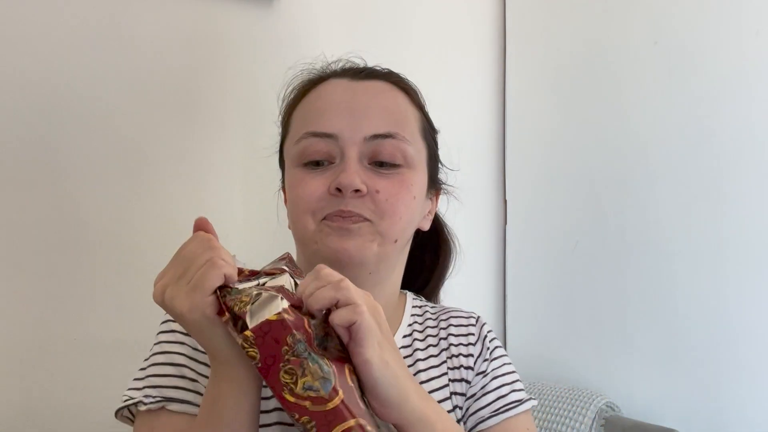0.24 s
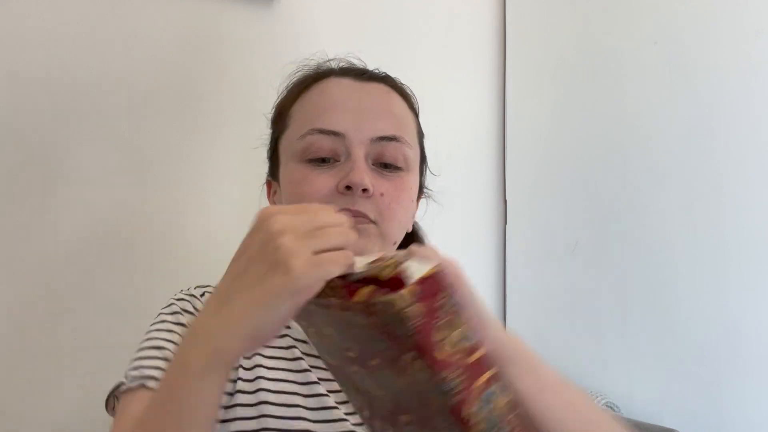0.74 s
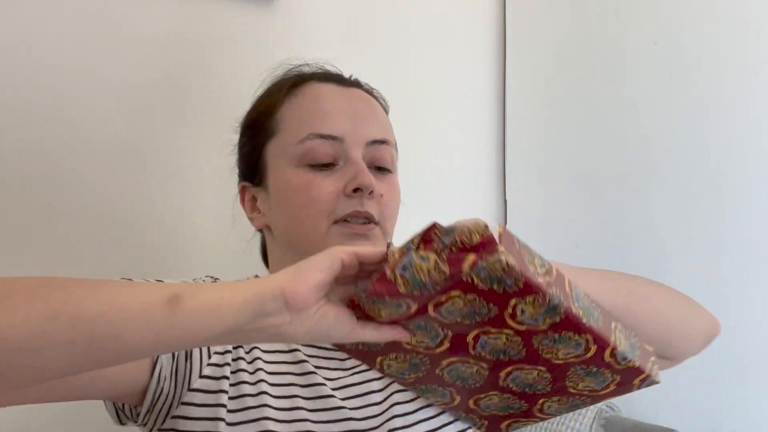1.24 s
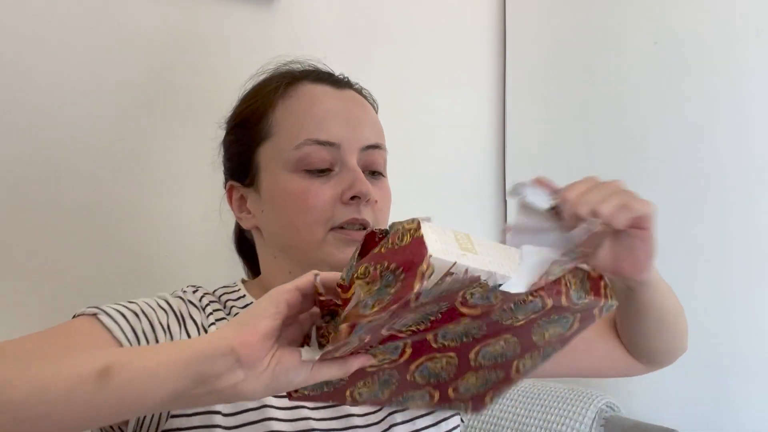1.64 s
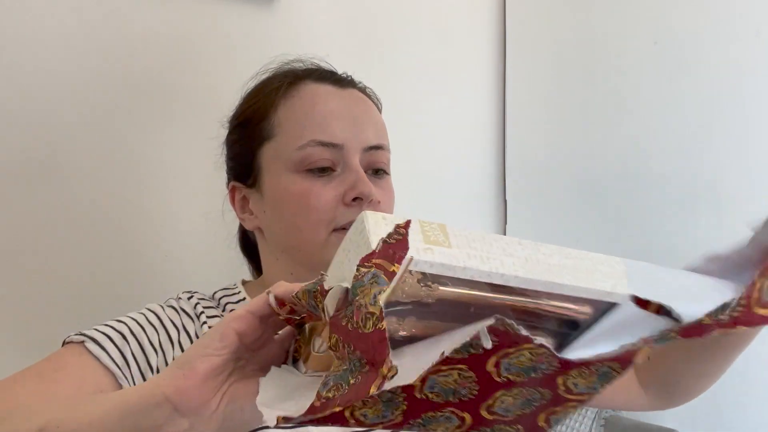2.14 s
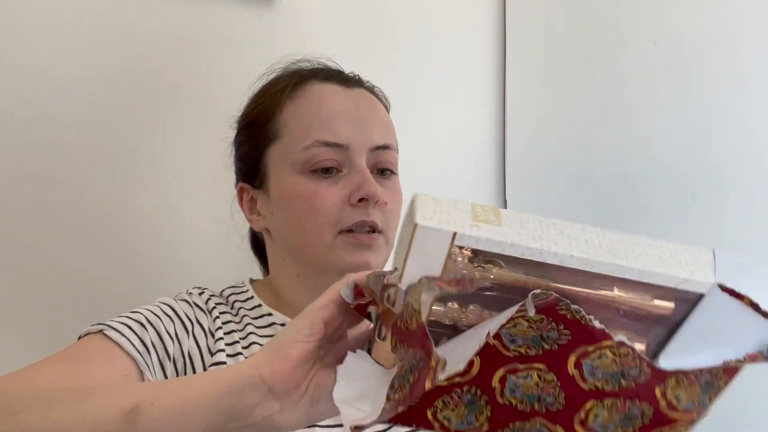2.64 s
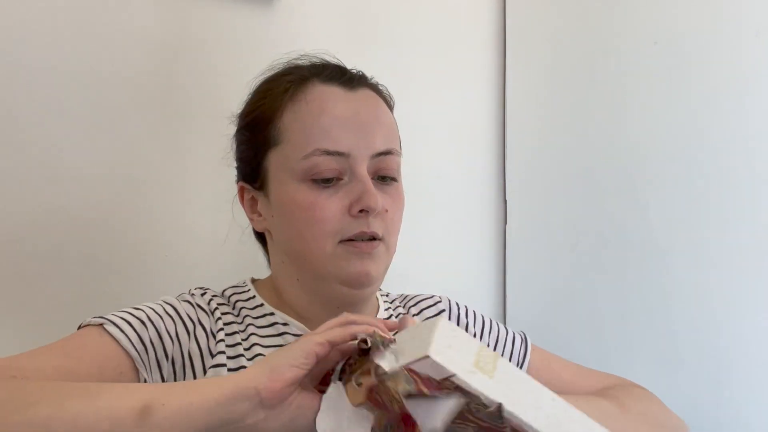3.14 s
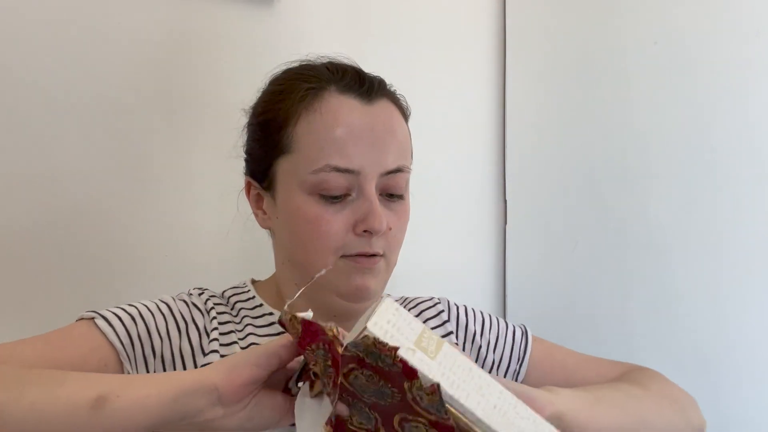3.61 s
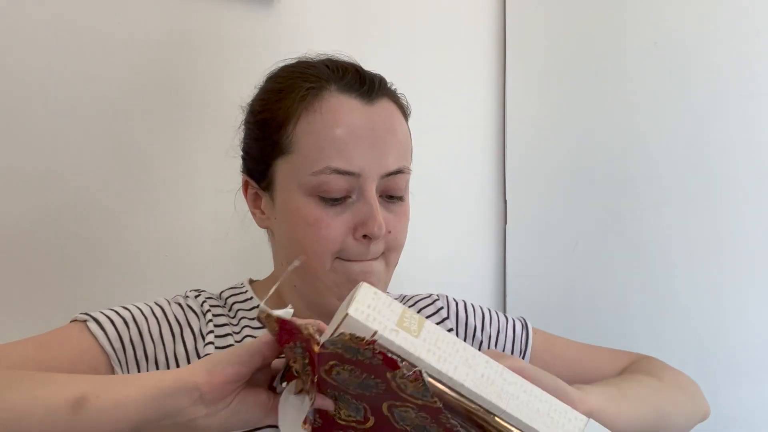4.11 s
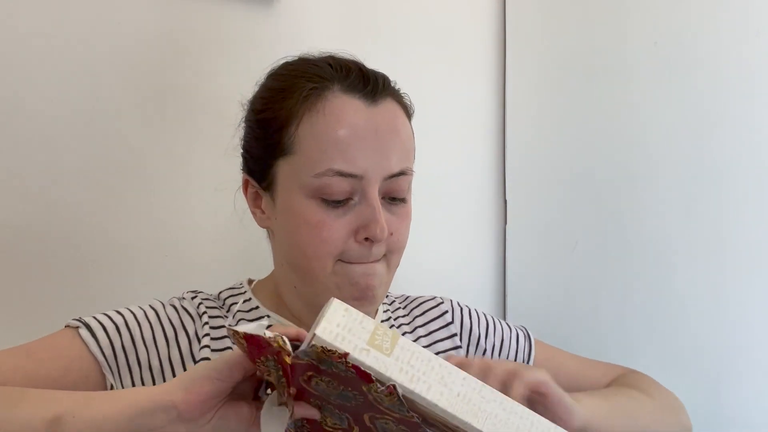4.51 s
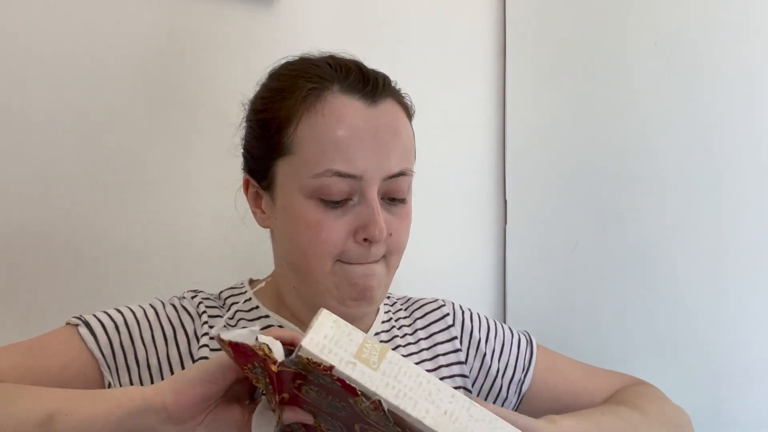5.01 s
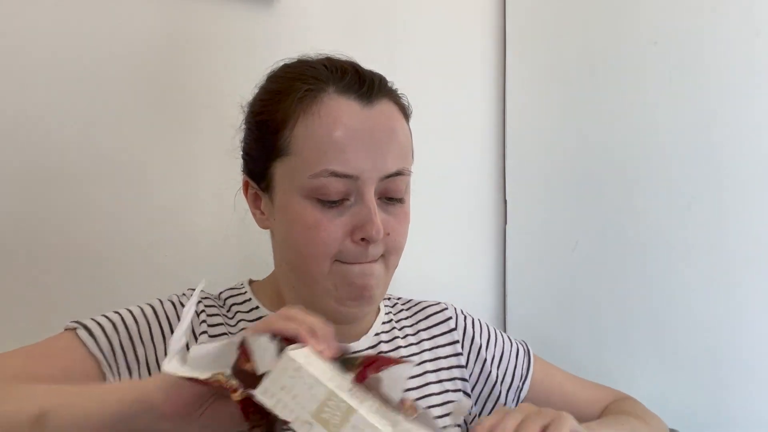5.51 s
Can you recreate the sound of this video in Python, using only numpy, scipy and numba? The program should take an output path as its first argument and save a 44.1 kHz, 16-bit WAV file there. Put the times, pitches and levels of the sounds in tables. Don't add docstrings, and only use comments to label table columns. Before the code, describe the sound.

A close stereo phone pickup in a small room with a short, slightly dull tail and a barely audible low hum. From 0 to 0.8 s, stiff glossy paper crinkles in dry, bright swarms of tiny snaps, with a hard crack near 0.33 s and soft finger knocks. It thins around 0.9-1.2 s. At 1.25 s comes the loudest moment: a ripping crack with a hollow low box knock, followed by taps and tearing until about 2 s, including a dull thump near 1.9 s. Crisp bright ticks snap at 2.13-2.16 s. From 2.2 to 2.9 s it is nearly quiet, with faint pats. Between 2.9 and 3.7 s, looser rustles, pops and boxy knocks return. A sharp hollow pop lands at 3.9 s. Sparse crinkles and light knocks follow, with a fuller crackle and knock at 4.97 s, soft rustling near 5.2-5.4 s, and small taps around 5.65 s.

```python
import sys
import numpy as np
from scipy import signal
from scipy.fft import rfft, irfft, next_fast_len
from scipy.io import wavfile
from scipy.ndimage import uniform_filter1d, minimum_filter1d, map_coordinates
from numba import njit

SR = 44100
rng = np.random.default_rng(int(sys.argv[2]) if len(sys.argv) > 2 else 0)


def field_ratio(decibels):
    return 10 ** (np.asarray(decibels, dtype=float) / 20)


def unload_wav(signal):
    wavfile.write(
        sys.argv[1],
        SR,
        np.round(np.clip(np.atleast_2d(signal).T, -1, 1) * 32767).astype(np.int16),
    )


N = 253731

# frequency in Hz, lag of the left port in turns, random spread by the walls in turns.
PORT_TURNS = [(104, 0, 0.017), (314, 0.11, 0.2), (1190, 0.059, 0.26), (3050, 0.19, 0.25),
              (4700, 0.46, 0.32), (7050, 0.69, 0.22), (10350, 1.08, 0.016), (10880, 1.1, 0.12),
              (10920, 1.19, 0.079), (13730, 1.38, 0.028), (16400, 1.44, 0.066)]


def along(table, hz, column=1):
    rows = np.transpose(table)
    return np.interp(np.log(np.maximum(hz, 1)), np.log(rows[0]), rows[column])


def hum():
    # time in seconds, level in dB.
    hum_levels = [(0.0, -58.5), (0.32, -71.5), (0.67, -63), (0.83, -72), (1.02, -70), (1.34, -60),
                  (1.63, -74), (1.89, -72), (2.91, -69), (3.14, -74.5), (4.02, -68.5), (4.31, -84),
                  (4.56, -76), (4.72, -72.5), (5.75, -76)]
    t, db = np.transpose(hum_levels)
    mains_band = signal.butter(2, [43, 60], "band", fs=SR, output="sos")
    drone = signal.sosfilt(mains_band, rng.standard_normal(N))
    return drone / drone.std() * field_ratio(np.interp(np.arange(N) / SR, t, db) + 11.5)


def room(x):
    t60_s, tail_db = 0.17, -6.5
    # frequency in Hz, left minus right in dB.
    port_balance = [(60, -1), (150, 3.5), (380, -2.5), (1300, -3), (2400, 1.5), (4400, -2), (9000, -1.5),
                    (15000, 0.5)]
    size = next_fast_len(N + SR)
    hz = np.arange(size // 2 + 1) * SR / size
    t = np.arange(SR // 2) / SR
    fade = field_ratio(-60 * t / t60_s) * np.clip(t / 0.0015, 0, 1)
    tails = rng.standard_normal((2, len(t))) * fade / np.sqrt(np.sum(fade ** 2))
    both, apart = rfft(tails, size)
    walls = both + apart * np.array([[1], [-1]]) * hz / (hz + 250)
    path = 1 + field_ratio(tail_db) * walls / (1 + hz / 5000)
    balance = field_ratio(along(port_balance, hz) * np.array([[.5], [-.5]]))
    return irfft(rfft(x, size) * path * balance, size)[:, :N]


def box(x):
    # mode frequency in Hz, width in Hz, level in dB.
    box_modes = [(126, 31, -12.5), (405, 21.7, 7.5), (508, 117, -6.5), (1030, 290, -5.5), (1560, 40, -51)]
    out = x
    for hz, width, db in box_modes:
        out = out + field_ratio(db) * signal.lfilter(*signal.iirpeak(hz, hz / width, SR), x)
    return out


@njit
def ring_loop(start, hz, t60, size, turn, left, swell):
    out = np.zeros((2, N))
    for k in range(len(start)):
        r = np.exp(-np.log(1000) / (t60[k] * SR))
        p = r * np.exp(2j * np.pi * hz[k] / SR)
        z = size[k] * np.sqrt(2 * (1 - r * r)) * np.exp(2j * np.pi * turn[k])
        gap, close = 1., np.exp(-hz[k] / (swell * SR))
        for i in range(start[k], min(N, start[k] + int(t60[k] * SR * 2 / 3) + 2)):
            gap *= close
            out[0, i] += (1 - gap) * (z * left[k]).imag
            out[1, i] += (1 - gap) * z.imag
            z *= p
    return out


def rings(s, hz, t60, db, swell):
    chance = rng.standard_normal((len(s), 2))
    lag = along(PORT_TURNS, hz) + along(PORT_TURNS, hz, column=2) * chance[:, 0]
    left = np.exp(-2j * np.pi * lag)
    return ring_loop((s * SR).astype(np.int64), hz, t60, field_ratio(db), chance[:, 1], left, max(swell, .02))


def knocks(detune=0.626, late_cycles=1.134):
    # start in seconds, peak in dB, pitch in Hz, ring t60 in seconds.
    finger_knocks = [(4.322, -29.5, 432, 0.055), (.281, -29, 597, 0.04), (.334, -26.5, 492, 0.044),
                     (.48, -26.5, 497, 0.031), (.532, -29.5, 560, 0.026), (.622, -25, 245.5, 0.12),
                     (.799, -34, 284, 0.065), (.854, -31.5, 402, 0.029), (1.143, -39, 487, 0.13),
                     (1.26, -13, 194, 0.036), (1.357, -30, 428, 0.073), (1.53, -29, 560, 0.041),
                     (1.793, -25, 469, 0.14), (2.414, -25, 219.5, 0.11), (2.737, -26.5, 370, 0.051),
                     (2.812, -32.5, 417, 0.058), (3.046, -28, 570, 0.035), (3.078, -20.5, 510, 0.066),
                     (3.188, -28, 314, 0.062), (3.414, -28, 256, 0.03), (3.645, -25, 423, 0.063),
                     (3.84, -25.5, 438, 0.041), (4.05, -30.5, 569, 0.12), (4.299, -27.5, 412, 0.045),
                     (4.43, -39, 693, 0.059), (4.6, -34.5, 421, 0.095), (4.725, -29, 197, 0.13),
                     (4.852, -30, 456, 0.069), (4.964, -22, 531, 0.084), (5.234, -34, 533, 0.17)]
    # start in seconds, peak in dB, pitch in Hz.
    nail_taps = [(.154, -27, 980), (.908, -43, 704), (1.319, -18, 1690), (1.568, -17.5, 514),
                 (2.036, -23, 1204), (2.151, -35, 1080), (2.306, -39, 1200), (2.551, -42, 452),
                 (2.926, -35, 446), (3.253, -23.5, 1385), (3.346, -28.5, 1060), (3.534, -27.5, 1060),
                 (3.82, -36, 402), (3.898, -14.5, 1010), (4.586, -33.5, 730), (5.521, -38, 690),
                 (5.654, -25, 985)]
    # start in seconds, peak in dB, pitch in Hz.
    palm_thumps = [
        (1.93, -24.5, 130),
        (2.42, -41, 140),
        (2.742, -30.5, 150),
        (3.66, -26, 133),
        (4.315, -50, 159),
        (4.588, -28.5, 148),
        (5.66, -33, 129),
    ]
    tap_t60_s, thump_t60_s = 0.019, 0.16
    taps = np.insert(nail_taps, 3, tap_t60_s, axis=1)
    thumps = np.insert(palm_thumps, 3, thump_t60_s, axis=1)
    hits = np.vstack([finger_knocks, taps, thumps])
    s, db, hz, t60 = (np.repeat(c, 5) for c in hits.T)
    step = np.tile(np.arange(-2, 3), len(hits))
    ratio = 2 ** (step * detune * (0.561 + .5 * rng.random(len(s))))
    late = late_cycles * (2 - step) / 4 * np.clip(1 / (hz * ratio) - 1 / 900, 0, 1)
    start = s + 0.001496 + late
    level_db = db + 12.0 - 5 * abs(np.log2(ratio))
    return rings(start, hz * ratio, np.clip(t60, .006, .4) / ratio, level_db, 0.47)


def gestures(t, table, rise, sag, fade):
    s, hold, db, bright = (c[:, None] for c in np.transpose(table))
    late = t - s
    rising = rise * np.minimum(late, 0)
    sagging = sag * np.clip(late, 0, abs(hold))
    fading = fade * np.maximum(late - abs(hold), 0)
    power = field_ratio(2 * (db + rising - sagging - fading))
    return power.sum(axis=0), (power * bright).sum(axis=0)


def hands():
    # start in seconds, hold in seconds, crackle in dB, brightness in dB.
    sudden_tugs = [(0.0, 0.0063, -35, 3.5), (0.047, 0.042, -35.5, 5.5), (0.239, .08, -36.5, 2.5),
                   (0.324, 0.024, -44.5, 4), (0.475, 0.057, -39, 5.5), (0.578, 0.075, -40.5, -4.5),
                   (0.69, 0.032, -41, 2.5), (0.796, 0.052, -48.5, 0), (0.916, .02, -54, -4.5),
                   (1.041, 0.034, -48.5, -1), (1.142, 0.036, -42, -4.5), (1.262, 0.099, -23.5, 1.5),
                   (1.532, 0.036, -29.5, 3), (1.783, .03, -47, 1), (2.138, 0.028, -33, -0.5),
                   (2.28, 0.0077, -53.5, 5), (2.393, 0.019, -57.5, -2.5), (2.618, 0.065, -64.5, 3),
                   (2.925, 0.068, -45.5, 4), (3.006, 0.09, -40, 1), (3.093, 0.041, -42, 0.5),
                   (3.639, .05, -47, 0.5), (3.83, 0.016, -40.5, -0.5), (3.895, 0.019, -39.5, -5.5),
                   (4.482, 0.02, -57, -3), (4.595, 0.044, -54.5, -13), (4.972, 0.13, -35, -1),
                   (5.511, 0.022, -56.5, 4), (5.624, 0.043, -48.5, 0), (5.736, .03, -46.5, -5)]
    # start in seconds, hold in seconds, crackle in dB, brightness in dB.
    slow_slides = [(0.183, 0.026, -36.5, 1), (0.405, .03, -38, -2), (1.22, .02, -46, -12),
                   (1.43, 0.0081, -46.5, 9), (1.611, 0.034, -31.5, 3.5), (1.836, 0.11, -29.5, 5),
                   (1.92, 0.1, -31, -1), (2.768, .04, -59.5, 2), (2.832, 0.014, -52, 10.5),
                   (3.191, 0.075, -41, 0), (3.384, 0.043, -62, -14), (3.536, 0.028, -45.5, -0.5),
                   (3.719, 0.062, -43, -1), (4.023, 0.061, -45.5, -0.5), (4.27, 0.059, -52, 11),
                   (4.723, 0.032, -43, 6), (4.86, 0.045, -43.5, 5), (5.169, 0.24, -43.5, 2),
                   (5.347, 0.033, -40, 3.5), (5.565, 0.033, -54, 0)]
    # time in seconds, resting rustle in dB, contact of paper and box in dB, slack in dB.
    grip_points = [(0.0, -62, 5.5, 4), (.35, -48, -2, -13.5), (.7, -51.5, -0.5, 1), (1.0, -62.5, 0, -9.5),
                   (1.6, -53, -1.5, 2), (2.0, -69, -1, -4.5), (2.3, -64.5, -8, -3.5), (2.55, -74.5, 13, 7),
                   (2.85, -61, 2.5, 0), (3.2, -47, -3.5, -1), (3.65, -72, 4, -0.5), (4.1, -55, 2.5, -3),
                   (4.33, -56.5, 5, 1.5), (4.575, -83, 1, -12), (4.62, -71, 4.5, -2.5),
                   (5.0, -59, -5.5, -2), (5.4, -69, -3, 1), (5.75, -61, 2, -2.5)]
    boom_keep = 0.21
    dull_share = 0.33
    t = np.arange(0, N / SR, 1 / 500)
    at, rest_db, contact_db, slack_db = np.transpose(grip_points)
    tug_power, tug_bright = gestures(t, sudden_tugs, rise=557, sag=79.5, fade=205)
    slide_power, slide_bright = gestures(t, slow_slides, rise=150, sag=50.5, fade=189)
    power = tug_power + slide_power + field_ratio(2 * np.interp(t, at, rest_db))
    top = 10 * np.log10(power)
    bright = (tug_bright + slide_bright) / power
    middle = np.interp(t, at, slack_db) - dull_share * bright
    boom = np.interp(t, at, contact_db) - boom_keep * (top + 45)
    return t, top, middle, boom, bright


def walk(rate):
    k = int(SR / rate)
    return 1.32 * uniform_filter1d(np.repeat(rng.standard_normal(N // k + 1), k), k)[:N]


def folds(s, hz, per_s=10, per_octave=5.5):
    grid = rng.standard_normal((int(N / SR * 30) + 2, 60))
    place = [s * min(per_s, 30), np.log2(hz / 100) * min(per_octave, 7)]
    return 1.32 * map_coordinates(grid, place, order=1)


def snaps(s, band_db, t60, cycles, spread_s, scatter_db, count):
    # frequency in Hz, level in dB per Hz.
    sheet_response = [(100, -4), (200, 2.5), (700, -2), (2000, 1), (5000, 1.5), (8000, 1.5), (11000, -3),
                      (14000, 1), (15800, 5.5), (16500, -27)]
    band_centres = np.log([270, 1200, 3600, 9000])
    chance = rng.random((len(s), count, 3))
    rank = (np.arange(count) + chance[..., 0]) / count
    hz = 100 * 165 ** rank ** .6
    place = np.interp(np.log(hz), band_centres, np.arange(4))
    db = sum(np.clip(1 - abs(place - k), 0, 1) * band_db[k][:, None] for k in range(4))
    share_db = 10 * np.log10(hz / 6500 * 0.67 / (rank + 0.0072) ** 0.35)
    db = db + along(sheet_response, hz) + share_db + scatter_db * (chance[..., 1] - .5)
    start = s[:, None] + np.reshape(spread_s, (-1, 1)) * chance[..., 2] ** 2
    db = db + 2.2 * folds(start, hz)
    ring = np.reshape(t60, (-1, 1)) + cycles / hz
    return rings(start.ravel(), hz.ravel(), ring.ravel(), db.ravel(), 0.24)


def lone():
    # start in seconds, treble peak in dB, middle relative in dB, crispness in dB.
    full_cracks = [(.3356, -10.5, -9.5, 4), (.4273, -20.5, -3, -2), (.4768, -25, -7, 1.9),
                   (.535, -16.5, 1, -5), (.621, -25, 5, 1.3), (.6954, -20, -8, 0), (.8041, -33, 10.5, -5),
                   (.9082, -28.5, 6, -1), (1.1353, -26, -3.5, 0), (1.2515, -14.5, 0, 2),
                   (1.2616, -10.5, -4, -9), (1.4341, -25, -2, .6), (2.2807, -29.5, -5, -5.5),
                   (2.3047, -26, 2.5, 0.5), (2.4106, -36.5, 13, -1), (2.6056, -44, 16, -3.5),
                   (2.7388, -39.5, 22.5, -5.5), (2.9287, -27, 6, -3.5), (3.0105, -27, -6, 4),
                   (3.0804, -35.5, 24.5, -2), (3.254, -34.5, 10, -3), (3.538, -23.5, 6, -6.5),
                   (3.6319, -36.5, 16, -1.5), (3.8417, -18, 6, -0.5), (3.901, -18.5, -8, -1.5),
                   (4.495, -33, 2.5, -3.5), (4.5839, -40.5, 14.5, 3), (4.6898, -39, 11.5, 6.5),
                   (4.9651, -19.5, 12, -2.5), (5.6323, -27.5, -8, 4.5)]
    # start in seconds, treble peak in dB, crispness in dB.
    thin_ticks = [(.0509, -14.5, 2), (.0739, -27, 7.5), (.2373, -18.5, 0.5), (.5896, -29, 3.5),
                  (.6734, -35, 1), (1.04, -35, -1), (1.1069, -40, 0.5), (1.1912, -45, -7),
                  (1.2027, -46.5, 22), (1.482, -35, 2), (1.494, -33, -11), (1.5244, -26, -2.5),
                  (1.672, -18, 4.5), (1.7498, -22, 8), (1.7913, -34, -8), (2.0936, -22, -10),
                  (2.1281, -11.5, -0.5), (2.155, -11, -1.5), (2.824, -48, 0), (3.178, -20.5, -14),
                  (3.5034, -49, 0.5), (3.8231, -23, 3.5), (4.6012, -52, 9), (4.7097, -30, -3.5),
                  (4.7292, -27, -3.5), (4.8603, -25, -5), (5.401, -26.5, 3.5), (5.5197, -28.5, -2),
                  (5.6098, -35, 0.5), (5.7387, -40, 1)]
    tick_mid_db = -24
    both = np.vstack([full_cracks, np.insert(thin_ticks, 2, tick_mid_db, axis=1)])
    return both[np.argsort(both[:, 0])].T


def hush(s, lead_s=0.029, depth_db=5):
    at, _, _, crisp_db = lone()
    k = np.minimum(np.searchsorted(at, s), len(at) - 1)
    wait = at[k] - s
    return -np.clip(depth_db + crisp_db[k], 0, 20) * np.exp(-abs(wait) / lead_s) * (wait > 0)


def pops():
    # start in seconds, peak in dB, pitch in Hz, ring in cycles.
    crease_pops = [(0.155, -27, 1400, 6), (0.907, -27, 2070, 6.6), (0.985, -37, 1510, 6),
                   (1.057, -39, 8540, 6), (1.107, -30, 3790, 6), (1.151, -28, 1030, 6),
                   (1.252, -11, 2330, 3.4), (1.482, -17.5, 7970, 6.8), (1.551, -21, 1420, 5),
                   (1.671, -22, 5830, 6), (1.749, -21, 5940, 6), (1.764, -25, 6250, 6),
                   (2.127, -24, 4230, 6), (2.305, -32, 1940, 6), (2.38, -43, 872, 6.6),
                   (2.521, -47, 1080, 6), (2.604, -46, 802, 5.3), (2.895, -43, 867, 6),
                   (2.973, -24, 2330, 6.9), (3.01, -23, 2120, 6.8), (3.028, -25, 2200, 6),
                   (3.08, -25, 1060, 6), (3.129, -23, 1890, 6), (3.163, -24.5, 950, 6),
                   (3.237, -26, 886, 6), (3.254, -19, 1330, 8.4), (3.473, -26, 2440, 5.4),
                   (3.525, -37, 1070, 6), (3.539, -29, 1080, 5.5), (3.753, -28, 902, 6),
                   (3.774, -26, 2570, 6), (3.822, -27, 1150, 6), (3.842, -32, 872, 5.5),
                   (3.899, -13, 910, 5.1), (3.929, -25, 2960, 6), (4.046, -24, 3000, 6),
                   (4.43, -42, 1070, 6), (4.584, -48, 1070, 5), (4.603, -34, 1080, 6.6),
                   (4.67, -34, 8300, 6), (4.73, -25, 5510, 6), (4.84, -29.5, 824, 6), (5.342, -28, 2140, 6),
                   (5.4, -24, 1420, 6), (5.428, -32, 1110, 6.6), (5.5, -34, 4090, 6),
                   (5.564, -35, 1090, 6.5), (5.655, -27, 950, 7), (5.667, -37, 1080, 6)]
    # start in seconds, peak in dB, pitch in Hz, ring in cycles.
    hollow_blooms = [(.856, -34, 420, 5.5), (1.321, -19, 1290, 10), (1.545, -22, 1500, 20),
                     (2.552, -48, 298, 8), (2.625, -41, 900, 18), (3.085, -24, 564, 19),
                     (3.828, -31.5, 412, 20), (3.908, -25, 400, 6.6), (3.911, -19.5, 270, 7),
                     (4.091, -38.5, 405, 18), (4.22, -41, 405, 22), (4.339, -39, 405, 25),
                     (4.759, -37, 300, 5.4), (5.662, -29.5, 506, 7.4)]
    # start in seconds, peak in dB, pitch in Hz, ring in cycles.
    singing_flaps = [(.626, -32, 1500, 12), (.696, -26, 2000, 14), (.912, -34, 1900, 16),
                     (1.05, -42, 2800, 25), (1.165, -33, 1200, 12), (1.27, -17, 2200, 20),
                     (1.276, -16, 3900, 20), (1.358, -21, 1300, 8), (1.528, -23, 2000, 25),
                     (1.555, -22, 1400, 20), (1.6, -24, 1500, 14), (1.795, -22, 4200, 20),
                     (1.9, -22, 1150, 16), (1.96, -24, 1100, 16), (3.034, -27, 3200, 20),
                     (3.05, -30, 2200, 25), (3.11, -29, 1000, 12), (3.18, -28, 6500, 20),
                     (3.3, -34, 1400, 25), (3.565, -36, 405, 20), (3.66, -34, 1100, 20),
                     (4.27, -38, 1000, 20), (4.86, -30, 800, 8), (4.966, -19, 1200, 6),
                     (4.978, -24, 2350, 35), (5.045, -29, 1300, 12), (5.18, -32, 2300, 25),
                     (5.375, -29, 1100, 10)]
    gain_db, spread_octaves, ring_s = -3.5, 0.36, .003
    events = np.vstack([crease_pops, hollow_blooms, singing_flaps])
    s, db, hz, cycles = (np.repeat(c, 3) for c in events.T)
    step = np.tile(np.arange(-1, 2), len(events))
    hz = np.minimum(hz * 2 ** (step * spread_octaves), SR / 3)
    t60 = ring_s + np.clip(cycles, 2, 40) / hz
    size = field_ratio(db + gain_db - 13 * abs(step)) * np.sqrt(t60 * SR / (4 * np.log(1000)))
    left = np.exp(-2j * np.pi * along(PORT_TURNS, hz))
    return ring_loop((s * SR).astype(np.int64), hz, t60, size, 0 * s, left, 0.33)


def cracks():
    s, top, mid, crisp_db = lone()
    tone_db = 1.5 * rng.standard_normal(len(s))
    bands = np.array([top + mid - 4, top + mid + 5, top + tone_db, top - tone_db])
    spread_s = .0007 * field_ratio(-2 * crisp_db)
    sharp = snaps(s, bands - 4 + crisp_db, 0.00094, 7.7, spread_s, 5.7, count=40)
    tail = snaps(s, bands - 10, 0.031, 27.0, .006, 22.8, count=60)
    return sharp + tail


def crackle(per_s=90, size_db=2.5, tone_db=2.5):
    chance = rng.random((int(per_s * N / SR), 2))
    s = chance[:, 0] * N / SR
    t, top, mid, low, air = hands()
    size = -size_db * np.log(1.04 - chance[:, 1]) + hush(s)
    tone = tone_db * rng.standard_normal((len(s), 4)).T
    bands = (top + low + 10, top + mid + 12, top + 8, top + air + 2)
    band_db = [np.interp(s, t, b) + size + c for b, c in zip(bands, tone)]
    return snaps(s, band_db, 0.0052, 4.6, .0005, 7.8, count=24)


def crinkle(per_s=1700, size_db=1.8, burst_db=1.2, patch_db=2.2):
    chance = rng.random((int(per_s * N / SR), 2))
    s = chance[:, 0] * N / SR
    at = (s * SR).astype(int)
    t, top, mid, low, air = hands()
    size = -size_db * np.log(1 - chance[:, 1]) + burst_db * walk(45)[at]
    size = size - 10 * np.log10(np.mean(field_ratio(2 * size)))
    size = size + hush(s)
    bands = (top + low + 17, top + mid + 14, top + 11, top + air + 8)
    band_db = [np.interp(s, t, b) + size + patch_db * walk(30)[at] for b in bands]
    return snaps(s, band_db, 0.008, 6.1, .002, 2.8, count=17)


def scene():
    touch = knocks() + pops() + cracks() + crackle() + crinkle()
    return room(box(touch)) + hum()


def band(x, lo_hz, hi_hz):
    size = next_fast_len(N)
    hz = np.arange(size // 2 + 1) * SR / size
    return irfft(rfft(x, size) * ((hz > lo_hz) & (hz < hi_hz)), size)[:N]


def starve(x):
    spare_moments = [.06, .86, 1.15, 1.4, 1.46, 1.79, 1.87, 1.94, 2.11, 2.35, 2.47, 2.57, 2.84, 2.89, 3.52,
                     3.64, 4.69, 4.8, 4.84, 5.19, 5.43, 5.6, 5.73]
    edge_hz, mid_top_hz, top_hz = (12500, 13650), 13200, 15900
    size, first, jump_db = 1024, 533, 6.8
    mid, side = (x[0] + x[1]) / 2, (x[0] - x[1]) / 2
    frame = (np.arange(N) + size - first + size // 2) // size
    power = uniform_filter1d(band(mid, 4000, 13000) ** 2, size=200) + 1e-12
    before = uniform_filter1d(power, size=1001, origin=500)
    jump = power > field_ratio(2 * jump_db) * before
    steady = uniform_filter1d(1. * (np.bincount(frame, jump) == 0)[frame], size=256)
    spare_frames = frame[(np.array(spare_moments) * SR).astype(int)]
    spare = uniform_filter1d(1. * np.isin(frame, spare_frames), size=512)
    luck = uniform_filter1d(rng.standard_normal(frame[-1] + 1), size=2)[frame]
    rich, poor = (uniform_filter1d(1. * (sign * luck > .4), size=512) for sign in (1, -1))
    mid = mid - steady * poor * band(mid, edge_hz[0], mid_top_hz)
    kept = spare * band(mid, 14900, 15900) + rich * band(mid, mid_top_hz, edge_hz[1])
    mid = mid - steady * (band(mid, mid_top_hz, SR) - kept)
    side = side - steady * band(side, 8900, 11100)
    no_jump = 1. * (power < field_ratio(jump_db) * field_ratio(2 * jump_db) * before)
    calm = uniform_filter1d(minimum_filter1d(no_jump, size=256), size=128)
    mid, side = (v - calm * band(v, top_hz, SR) for v in (mid, side))
    return np.array([mid + side, mid - side])


def band_limit(x):
    return signal.sosfilt(signal.butter(12, 16800, fs=SR, output="sos"), x)


def record(dry):
    rumble_cut = signal.butter(4, 40, "high", fs=SR, output="sos")
    mix = starve(signal.sosfilt(rumble_cut, dry))
    return band_limit(mix)


dry = scene()
out = record(dry)
unload_wav(out)
```